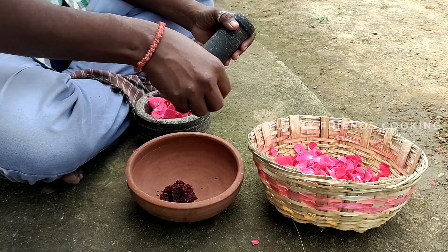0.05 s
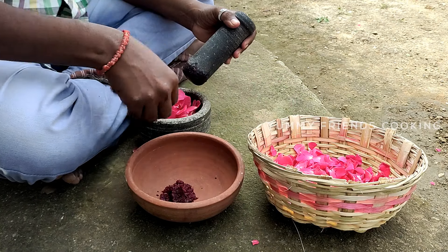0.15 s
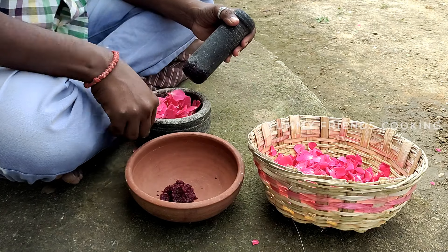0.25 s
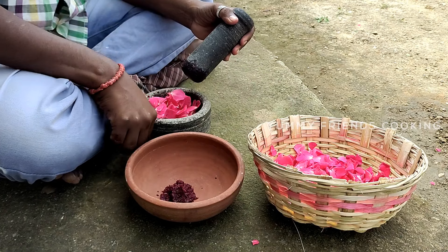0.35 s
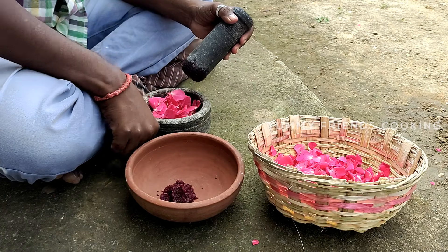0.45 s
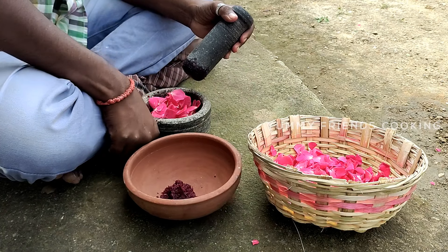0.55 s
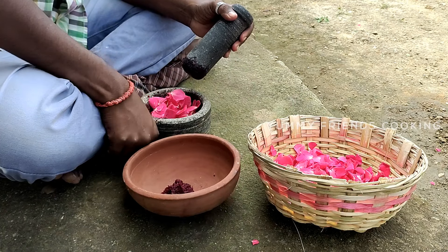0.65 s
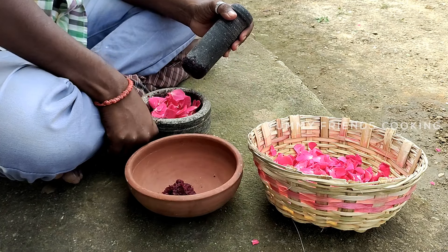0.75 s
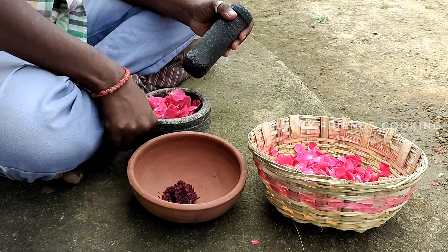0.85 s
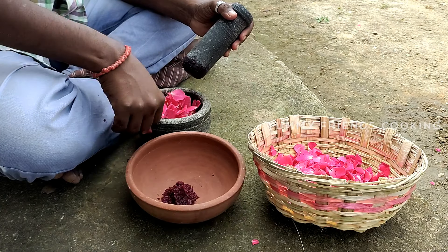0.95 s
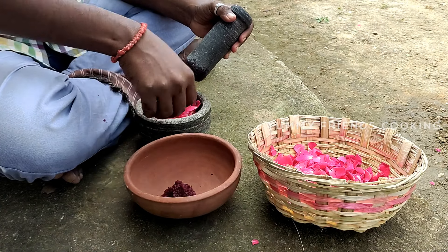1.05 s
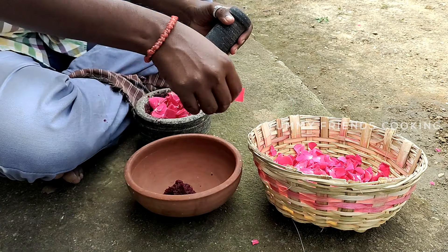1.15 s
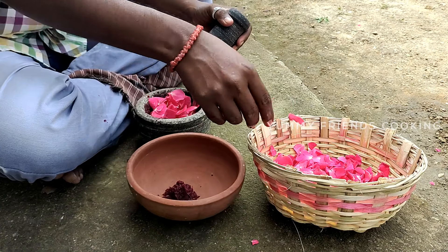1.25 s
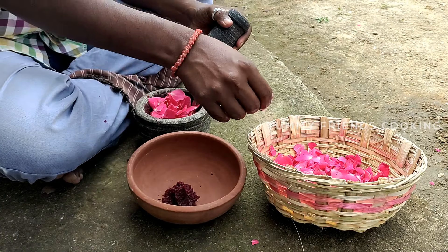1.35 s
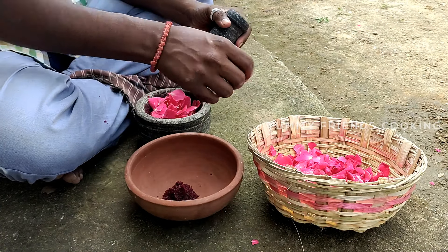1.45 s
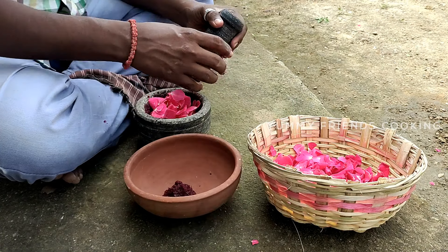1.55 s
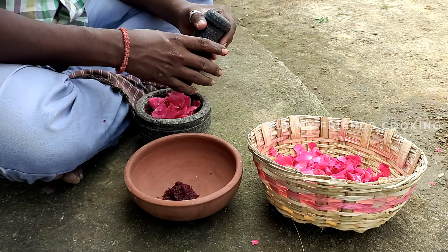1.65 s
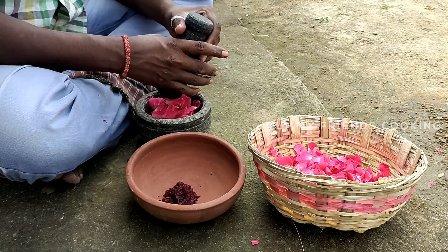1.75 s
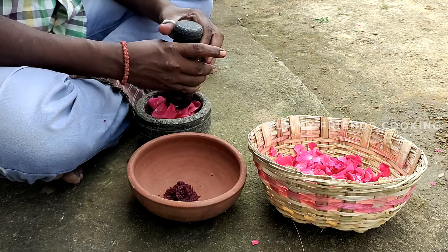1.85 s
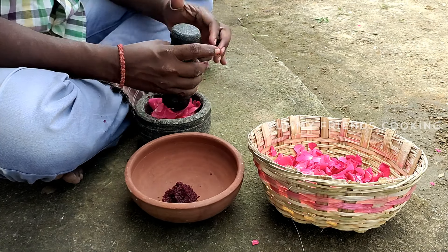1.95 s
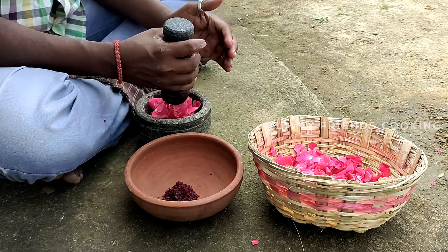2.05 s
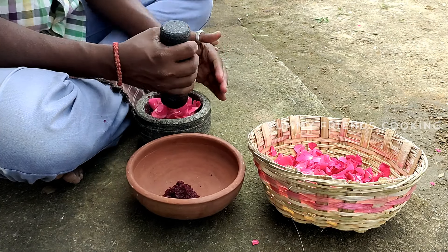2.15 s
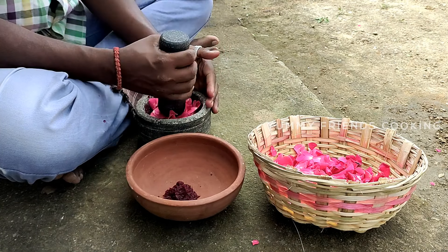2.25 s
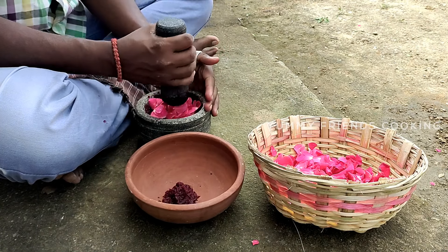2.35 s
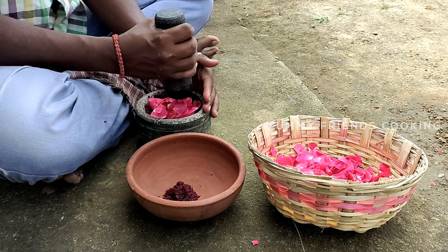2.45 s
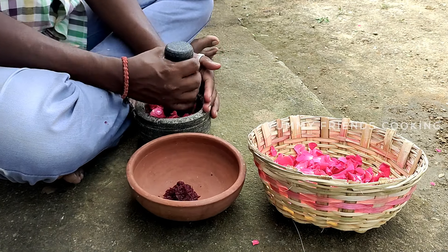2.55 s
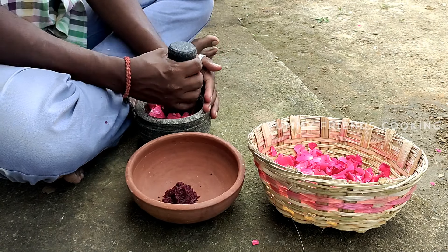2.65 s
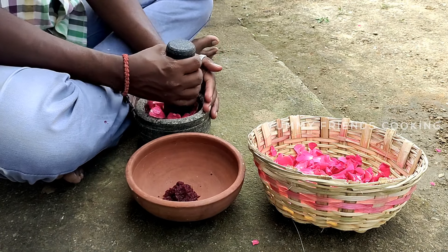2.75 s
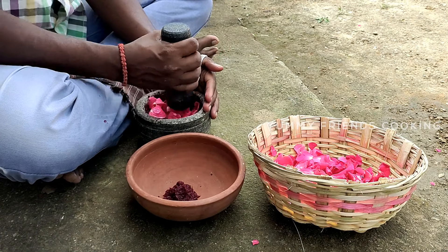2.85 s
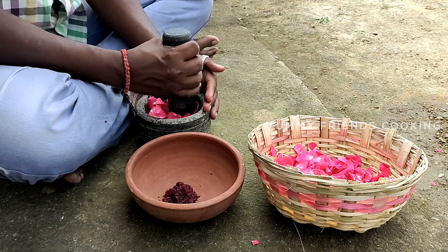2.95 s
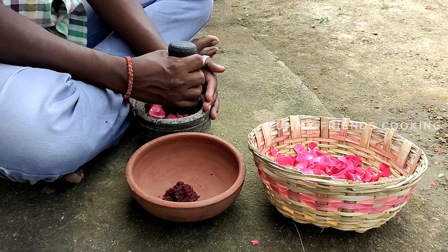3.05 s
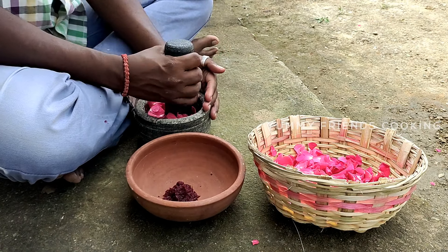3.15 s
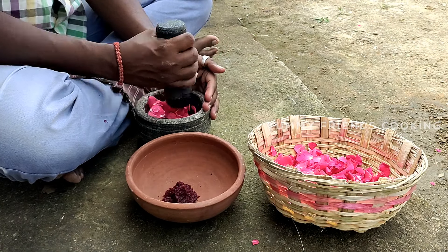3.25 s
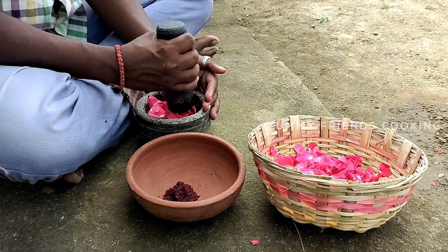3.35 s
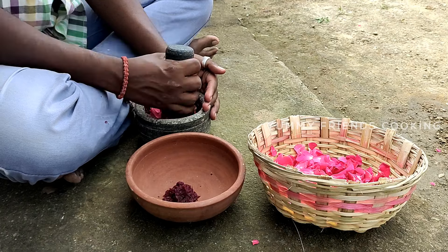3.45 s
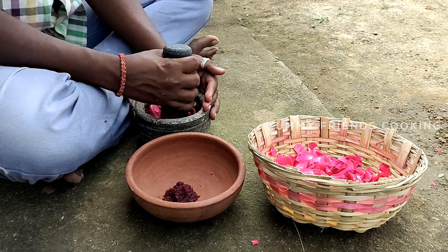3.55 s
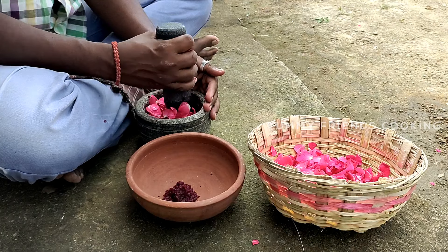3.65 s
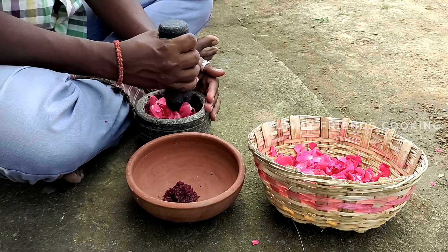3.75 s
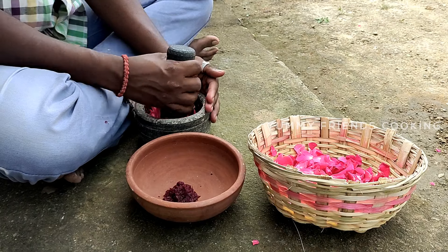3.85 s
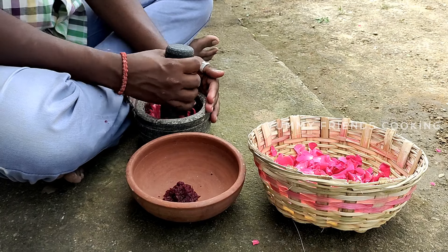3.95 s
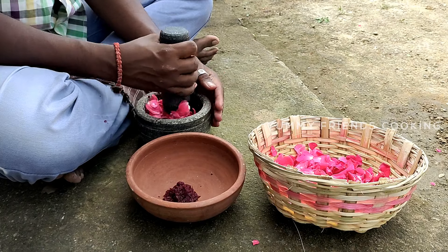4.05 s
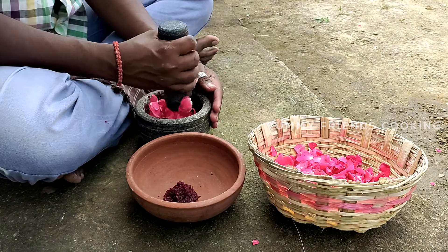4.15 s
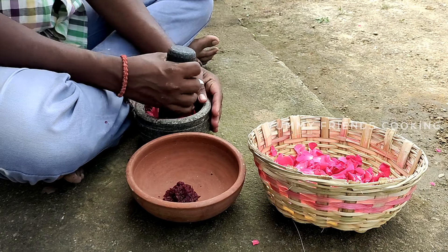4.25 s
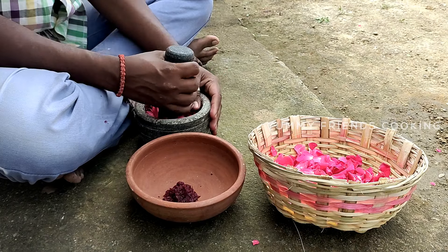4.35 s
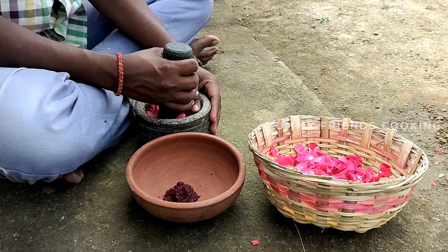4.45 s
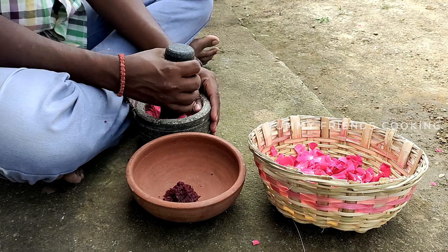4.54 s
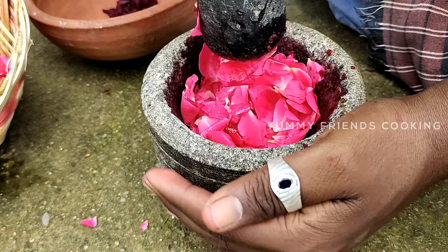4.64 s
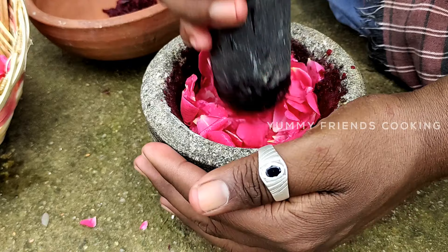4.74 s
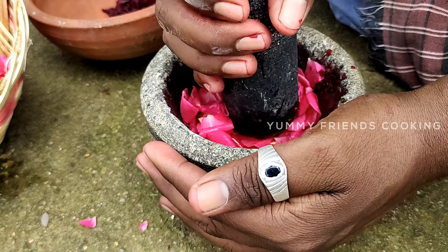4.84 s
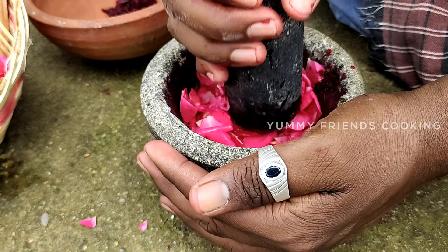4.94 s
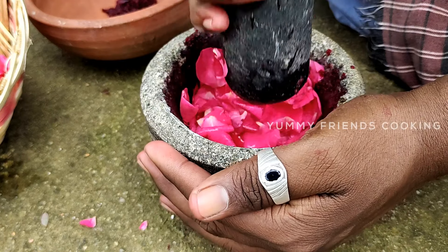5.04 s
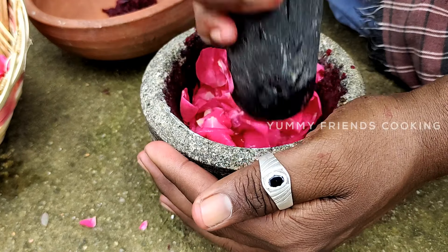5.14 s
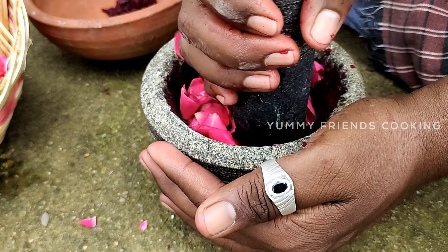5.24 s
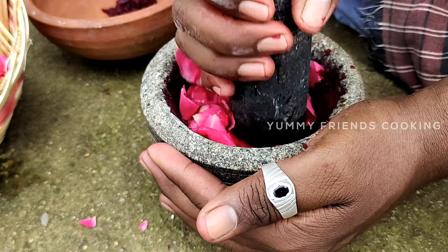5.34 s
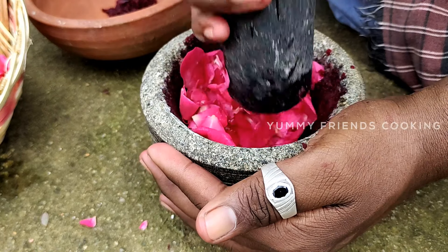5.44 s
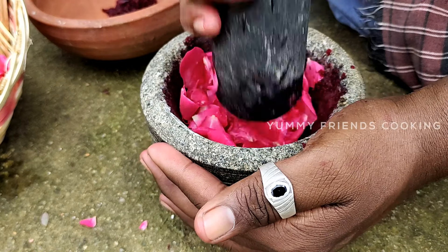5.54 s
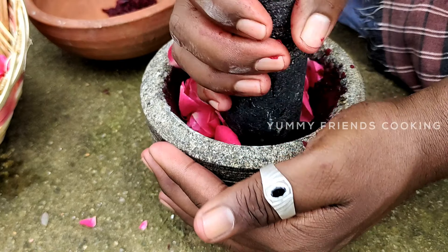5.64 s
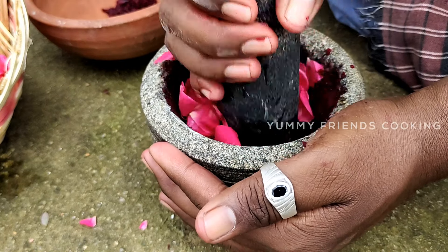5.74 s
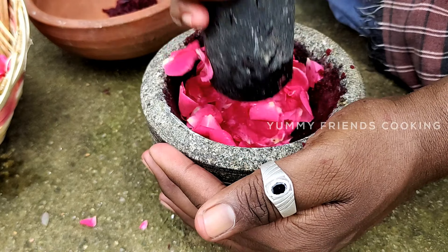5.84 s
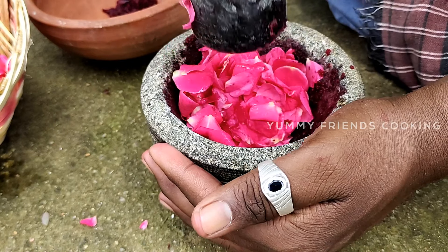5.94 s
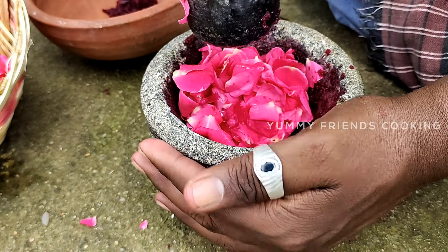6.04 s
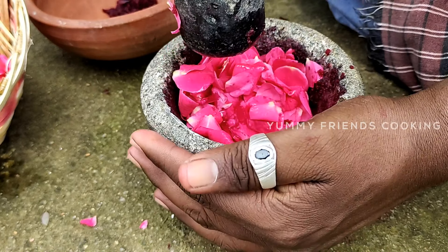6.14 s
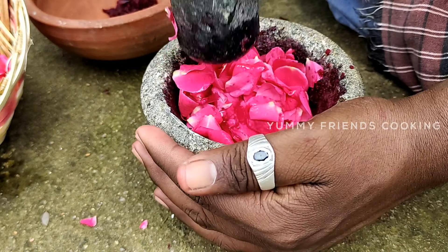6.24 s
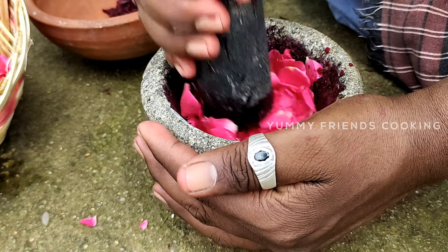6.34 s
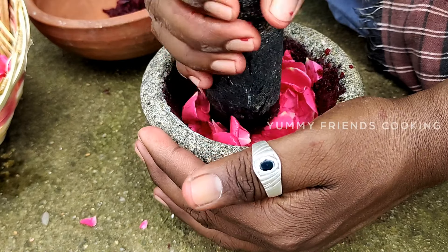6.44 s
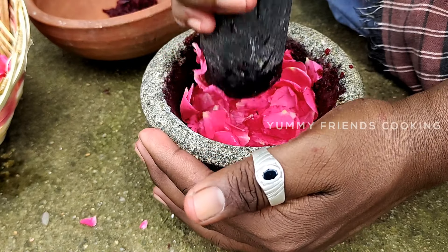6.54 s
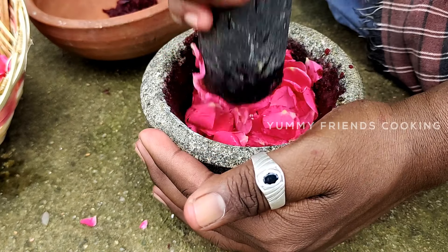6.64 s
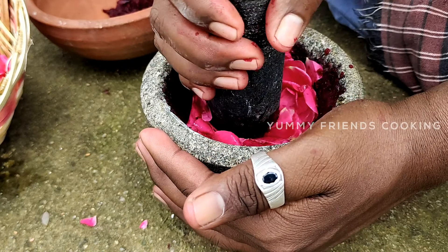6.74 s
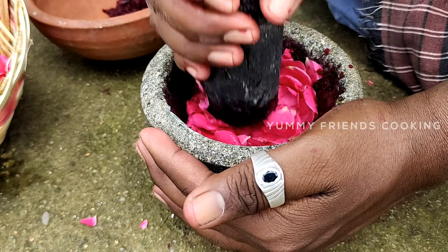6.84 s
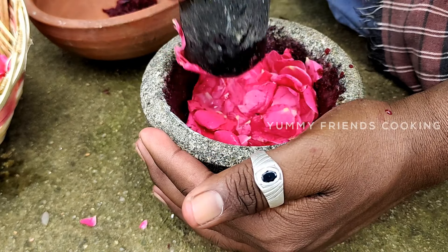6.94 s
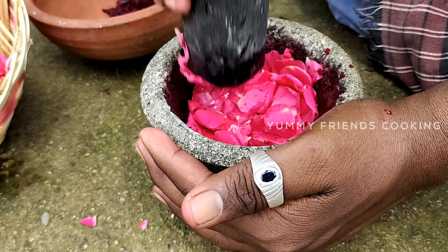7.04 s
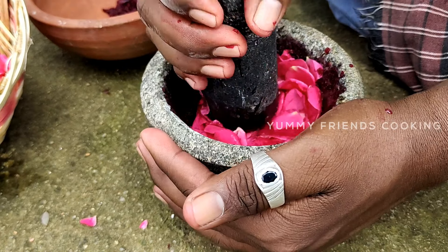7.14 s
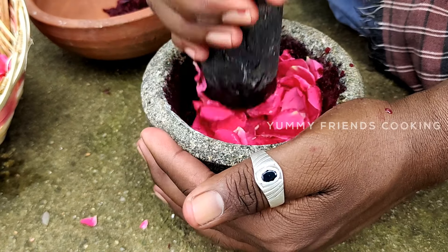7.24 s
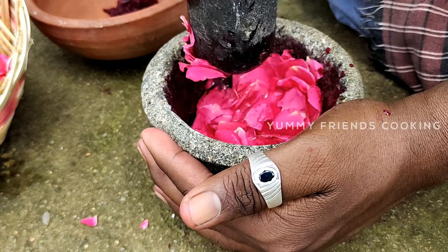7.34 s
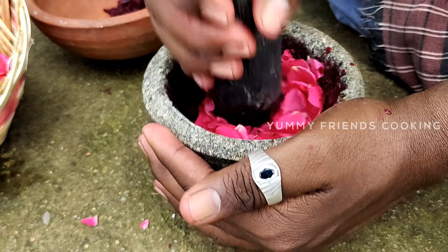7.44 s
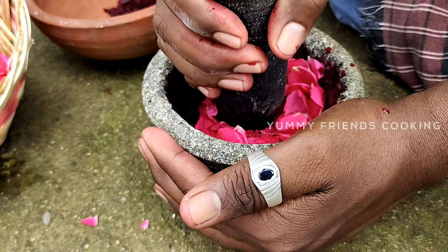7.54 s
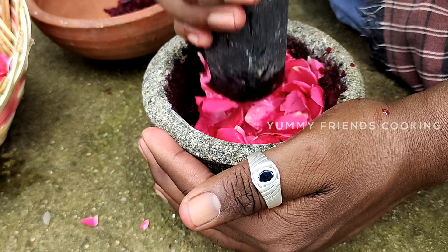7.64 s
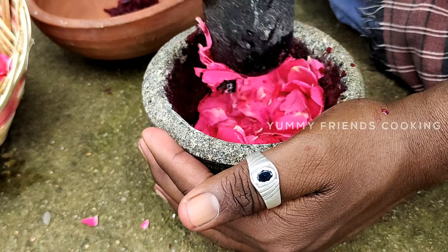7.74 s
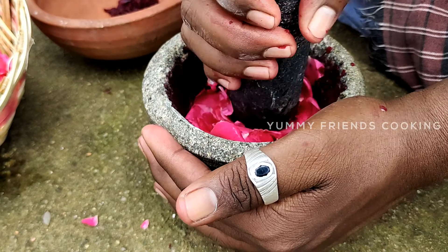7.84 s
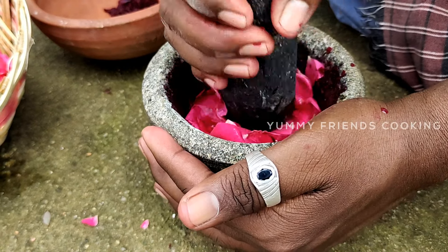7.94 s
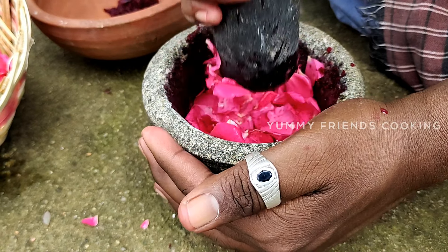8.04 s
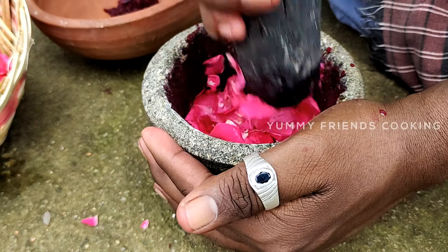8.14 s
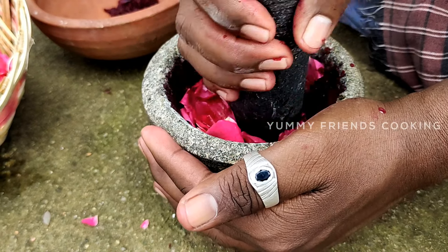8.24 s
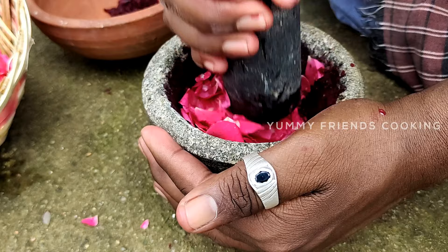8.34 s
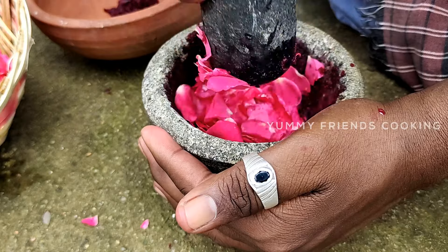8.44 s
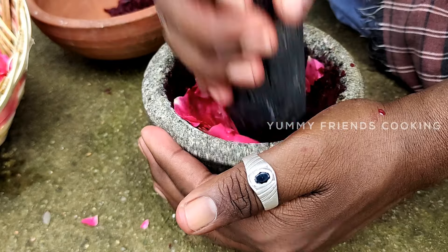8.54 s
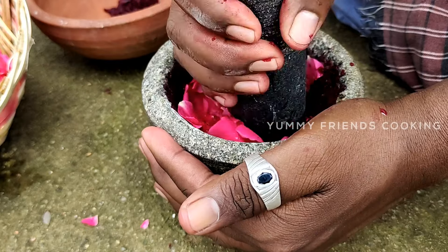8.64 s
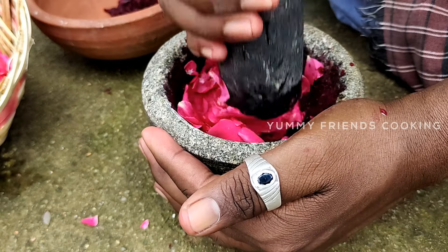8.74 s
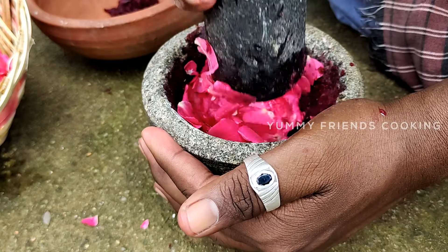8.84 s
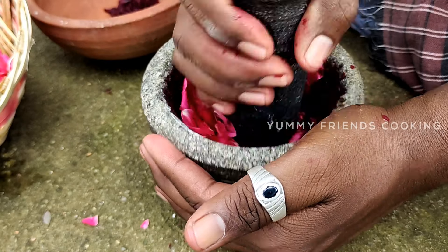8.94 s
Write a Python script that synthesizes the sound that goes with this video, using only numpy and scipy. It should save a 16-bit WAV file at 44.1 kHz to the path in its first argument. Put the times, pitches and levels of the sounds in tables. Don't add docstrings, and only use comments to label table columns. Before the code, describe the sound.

Outdoors, faint insects, far rumble and sparse chirps surround barely audible wet rustles. A stone pestle then begins pounding petals in a small mortar with five dull, earthy thumps and soft squashes. After a very brief silence, the sound turns close and bright: ten quick blows, many of them hard stone clacks with gritty crunches, the loudest slightly distorted, as birds keep calling.

```python
import sys
import numpy as np
from scipy import signal
from scipy.fft import rfft, irfft, next_fast_len
from scipy.io import wavfile
from scipy.ndimage import uniform_filter1d

SR = 44100
rng = np.random.default_rng(int(sys.argv[2]) if len(sys.argv) > 2 else 0)


def to_linear_factor(level_db):
    exponent = np.asarray(level_db, float) / 20
    return 10 ** exponent


def store_wav(level_fs):
    pcm = np.round(np.clip(np.atleast_2d(level_fs), -1, 1) * 32767)
    wavfile.write(sys.argv[1], SR, pcm.T.astype(np.int16))


N = 396459
CHANGE_S = 4.65

# [t/s, peak level/dB, f/Hz, contact length/cycles, rebound level/dB]
THUMPS = [(2.6449, -23, 129, 1.77, -48), (3.0739, -17.5, 141, 1.8, -37.5), (3.493, -16.5, 145, 2.02, -37),
          (3.8991, -13.5, 153.5, 1.9, -27), (4.3109, -16.5, 155, 2.1, -33), (4.89, -18, 162, 1.6, -40),
          (5.3066, -9, 219.6, 2, -47), (5.7099, -17.5, 225, 2.1, -33), (6.4146, -9.5, 205, 1.7, -44),
          (6.809, -10, 160, 1.9, -45), (7.1807, -10.5, 209.7, 1.7, -30), (7.5483, -10.5, 215, 1.5, -42),
          (7.9307, -14.5, 192, 1.5, -29), (8.282, -8, 193.5, 1.3, -26.5), (8.661, -5, 192, 1.39, -23.5)]
# [delay/s, f/Hz, length/cycles]
REBOUND = [
    (0.0116, 136, 2.76),
    (.0106, 250, 3.5),
]
# [t/s, peak level/dB, f/Hz]
LATER_THUMPS = [(2.6784, -37, 174), (2.6917, -44, 170), (3.9315, -38, 183), (4.346, -29, 183), (4.387, -37, 170),
                (4.418, -38, 179), (4.455, -46, 187), (4.9477, -39.5, 198), (5.3226, -16.5, 260),
                (5.338, -36, 200), (5.378, -36, 198), (5.7392, -28.5, 193), (5.7955, -36, 190), (6.4235, -19, 218),
                (6.4675, -30, 208), (6.488, -38.5, 200), (6.8203, -14, 226.5), (6.8302, -30, 172),
                (7.1951, -23, 234), (7.2216, -26, 213), (7.255, -41, 200), (7.5521, -13.5, 190), (7.569, -35, 191),
                (7.583, -27, 224), (7.95, -27.5, 213), (7.9643, -40, 166), (8.3104, -10, 218), (8.335, -32, 196.8),
                (8.699, -50, 200)]
# [t/s, level/dB, bowl level/dB, rim level/dB, pestle level/dB]
CLACKS = [(3.4915, -47.5, -12, 19, 10), (3.898, -49.5, 8.5, 27.5, 11), (4.3098, -46.5, 2, 20.5, 18.5),
          (4.347, -66, 20, -9, 0), (4.883, -23.5, -36, -6, -4), (5.3052, -4, -6.5, -5.5, -8),
          (5.709, -2.5, -10, -4, -14), (6.4142, -3.5, -16.5, -9, -13), (6.8066, -31, -14, 10, 9),
          (6.8086, -31, -15.5, 16, 10.5), (6.8229, -42.5, 21, 11, -6), (7.1802, -5.5, -15.5, -0.5, -16),
          (7.547, -3, -14.5, -0.5, -1), (7.927, -47, 10, -10.5, -8), (8.28, -7, -4, 0.5, -6.5),
          (8.3107, -31, 14.5, -9, -20), (8.659, -27.5, 8.5, -9, 4)]
# [f/Hz, level/dB, t60/s]
BOWL = [(449, 0, 0.016), (568, -14, 0.02), (860, -8.5, 0.0077)]
# [f/Hz, level/dB, t60/s]
BODY = [(1230, 6.5, 0.0061), (1150, -7.5, 0.0036), (1535, 1, 0.0063)]
# [f/Hz, level/dB, t60/s]
RIM = [(2212, 3.5, .01), (1940, -8, 0.011), (2550, -5, 0.0077)]
# [f/Hz, level/dB, t60/s]
RIM_SIDE = [(2147, -1, 0.016), (2753, -5.5, 0.017), (3720, -16, .025), (4410, -5, 0.018),
            (601, -15.5, 0.044)]
# [f/Hz, level/dB, t60/s]
PESTLE = [(4620, -28.5, 0.0043), (5127, -13.5, 0.023), (6170, -21, 0.006), (7060, -17.5, 0.021),
          (7700, -21.5, 0.0037), (9000, -26, .01)]
# [t/s, f/Hz, level/dB, t60/s]
LINGER = [(2.64, 1200, -48, .02), (3.498, 417, -46, 0.05), (4.309, 1000, -34, .02),
          (4.885, 1230, -21, 0.018), (7.928, 1490, -22, 0.011), (5.3053, 1880, -10.5, .01),
          (6.4144, 1540, -10, 0.0092), (7.1802, 1600, -4.5, .008), (6.807, 6550, -16.5, 0.011),
          (3.492, 2143, -35.5, 0.029), (3.492, 3596, -43, .06), (3.898, 2120, -29.5, 0.059),
          (4.309, 2350, -20.5, .025), (4.315, 1950, -42, 0.065), (4.315, 2500, -43, 0.065),
          (5.306, 1200, -21, .06), (5.306, 1906, -29, .069), (5.306, 2466, -30.5, 0.059),
          (5.306, 2659, -49, .2), (5.34, 2020, -43.5, 0.018), (5.71, 1260, -26, 0.1),
          (5.71, 1906, -23.5, .071), (5.716, 436, -22, 0.045), (5.71, 2665, -32.5, .11),
          (5.71, 5168, -35, 0.055), (5.788, 1230, -53.5, 0.22), (6.4154, 4046, -17.5, .008),
          (6.415, 1028, -31.5, 0.073), (6.415, 1776, -35, .049), (6.415, 2396, -32, .045),
          (7.181, 1150, -30.5, .05), (7.181, 2300, -29, .05), (7.548, 2078, -18.5, 0.031),
          (7.548, 2342, -21.5, 0.041), (7.548, 2573, -22.5, 0.061), (7.548, 1200, -35, .09),
          (7.548, 5152, -46, 0.086), (8.281, 1405, -39.5, 0.07), (8.281, 1938, -37, 0.14),
          (8.317, 413.3, -24.5, 0.034), (8.281, 4570, -36, 0.045), (8.658, 1250, -27, .04)]
# [t/s, hiss level/dB, grind level/dB]
SQUASH = [(2.635, -37, -48), (3.066, -33, -42), (3.489, -25, -24), (3.894, -26, -27.5),
          (4.306, -29.5, -32.5), (4.882, -21.5, -21), (5.303, -17.5, -16.5), (5.708, -20, -14.5),
          (6.411, -35.5, -24), (6.804, -11, -11.5), (7.177, -30.5, -19), (7.546, -25.5, -10.5),
          (7.926, -20.5, -21.5), (8.278, -23.5, -22.5), (8.6555, -18, -25.5)]
# [t/s, t60/s, hiss level/dB, grind level/dB]
SLIPS = [(1.219, 0.014, -61, -53), (.742, 0.011, -59, -56.5), (4.113, .008, -48.5, -71),
         (3.245, .012, -54, -64), (4.876, 0.02, -31.5, -45.5), (5.34, .1, -67, -44.5),
         (5.469, 0.017, -57, -72), (5.656, 0.018, -55, -70), (5.718, .05, -70.5, -36),
         (5.803, .012, -53, -72), (6.781, 0.047, -62.5, -58), (6.82, .025, -43.5, -35),
         (7.551, .0072, -24.5, -68), (7.915, 0.046, -52, -50), (8.287, 0.033, -27, -22),
         (8.368, .012, -38.5, -51), (8.409, 0.023, -47.5, -52.5), (8.629, 0.0126, -62, -57),
         (8.695, .015, -55, -63), (8.749, .015, -53, -68), (8.767, 0.079, -52, -62)]
# [t/s, hiss level/dB, grind level/dB]
SKIDS = [
    (6.426, -35.5, -40),
    (6.439, -35.5, -33),
    (6.448, -34.5, -33),
    (7.19, -24.5, -30.5),
]
# [t/s, hiss level/dB, grind level/dB]
PEELS = [(.48, -59, -64), (.58, -60, -69), (.9, -59, -69), (.96, -59.5, -66), (1.018, -54, -63),
         (2.28, -59, -62), (5.005, -60, -62.5), (5.434, -56.5, -63), (5.775, -71.5, -56),
         (5.826, -55.5, -64.5), (6.544, -55.5, -59), (6.905, -52.5, -56), (7.248, -50.5, -59.5),
         (7.658, -52.5, -59), (7.99, -58, -61.5), (8.033, -57.5, -61.5)]
# [f/Hz, level/dB per Hz]
HISS = [(1820, -30), (3100, -7.5), (3890, -4.5), (4340, -5.5), (5220, -6), (6030, -1.5), (7730, -1.5),
        (8280, -10), (8680, -12.5), (10400, -15.5), (12700, -22.5), (14700, -23.5), (16000, -33.5)]
# [f/Hz, level/dB per Hz]
GRIND = [(470, -34.5), (800, -13), (1280, 3.5), (1730, 0), (2230, 0.5), (3100, -14), (4030, -40),
         (6820, -120)]
# [f/Hz, level/dB per Hz]
GRIND_SIDE = [(260, -44), (450, -8), (1010, -2.5), (1490, -5.5), (1620, -6.5), (1930, -1.5), (2190, 2),
              (3100, -11), (4030, -37.5), (6820, -120)]
# [t/s, length/s, start f/Hz, end f/Hz, level/dB]
TICKS = [(0.737, .0093, 905, 520, -53), (.948, .005, 3230, 2880, -59), (1.01, 0.013, 1420, 1430, -61),
         (1.22, .006, 3360, 2600, -54), (4.35, 0.0068, 640, 556, -45), (4.898, 0.0082, 426, 393, -38.5),
         (5.506, .006, 2000, 1900, -56), (5.523, 0.0034, 2860, 1582, -43),
         (6.39, 0.0042, 1250, 1196, -54.5), (6.445, 0.0026, 2212, 2200, -24.5),
         (7.672, .011, 12220, 11730, -66), (8.369, .002, 12500, 10000, -44),
         (8.43, .002, 3400, 1820, -51.5), (8.6555, 0.0035, 3530, 3390, -23)]
# [t/s, start f/Hz, level/dB]
HOOKS = [
    (6.333, 5040, -54),
    (7.416, 4974, -51),
    (8.342, 4705, -54),
    (8.79, 5153, -51.5),
]
# [t/s, start f/Hz, level/dB]
PIPS = [
    (7.603, 4050, -59),
    (7.677, 4030, -56.5),
    (7.774, 4250, -59),
]
# [t/s, start f/Hz, level/dB, overtone level/dB]
WHISTLES = [
    (.108, 4640, -63.5, -28),
    (4.707, 4660, -58, -15),
    (5.126, 4650, -53.5, -7.5),
]
BEND = [2.1, 3]
# [t/s, length/s, start f/Hz, end f/Hz, level/dB]
SLIDES = [(0.05, 0.028, 7140, 7050, -58.5), (.064, 0.02, 7040, 5400, -68), (0.086, 0.04, 5400, 4700, -68),
          (0.166, .05, 4587, 4230, -70), (0.6, .115, 4560, 4230, -70.5), (4.766, 0.037, 4465, 4150, -59),
          (5.272, .025, 2900, 2750, -64.5), (5.185, .025, 4420, 4400, -60.5), (2.188, 0.18, 408, 437, -62),
          (3.432, .03, 2280, 2330, -62.5), (4.702, 0.05, 342, 440, -79), (4.824, 0.019, 3030, 2800, -58),
          (5.232, 0.036, 3346, 3180, -63.5)]
# [t/s, length/s, f/Hz, level/dB]
HELD = [(0.148, .15, 764, -65.5), (.32, .08, 770, -69), (.36, 0.044, 4060, -71), (3.29, 0.093, 6720, -66),
        (3.288, .03, 6350, -66), (0.768, .045, 4290, -72), (.98, .02, 794, -59.5), (1.972, 0.18, 601, -72),
        (3.923, 0.098, 682.6, -62.5), (4.086, .07, 381, -59.5), (4.143, .1, 6690, -67),
        (4.935, .04, 2430, -66), (5.012, 0.033, 2540, -65), (5.085, .04, 2540, -70.5),
        (5.41, .08, 2540, -70), (5.156, .12, 6390, -66.5), (5.21, 0.14, 4620, -65.5),
        (6.186, 0.05, 586, -63.5), (8.481, 0.047, 678, -65)]
# [f/Hz, t60/s]
YARD = [(300, 0.18), (2000, 0.059), (5000, 0.44), (12000, 0.27)]
# [f/Hz, level/dB per Hz]
AIR = [(20, -45.5), (45, -20.5), (100, -4.5), (150, -8), (300, -13), (1200, -22.5), (4600, -28),
       (5900, -28.5), (6700, -21), (7400, -22.5), (8200, -29.5), (11000, -34), (15300, -37), (16200, -58.5)]
AIR_DB = [-58, -58]
# [f/Hz, left minus right level/dB]
PORTS = [(30, -2), (60, 2), (125, 2), (250, 1.5), (500, 0.53), (1500, 0.2), (3000, -0.07), (7000, -1),
         (15000, 0.3)]
# [t/s, length/s]
MUTED = [(3.886, 0.0022), (5.293, .006), (5.692, 0.012), (7.525, 0.015), (8.265, 0.0097), (8.64, 0.0067)]
# [t/s, gain/dB]
JOIN = [(0, 0.5), (4.607, 0), (4.609, -23), (4.622, -56), (4.698, -60), (4.704, -17.5), (4.75, -5.5),
        (4.95, 0.5), (9, 1)]


def unit(x):
    return x / np.sqrt(np.mean(x ** 2) + 1e-20)


def along(points, hz):
    f, v = np.transpose(points)
    return np.interp(np.log(hz + 1), np.log(f + 1), v)


def filtered(x, response):
    m = next_fast_len(N + 8192)
    return irfft(rfft(x, m) * response(np.fft.rfftfreq(m, 1 / SR)), m)[..., :N]


def coloured(x, spectrum):
    return unit(filtered(x, lambda hz: to_linear_factor(along(spectrum, hz))))


def add(out, s, x):
    part = out[round(s * SR):][:len(x)]
    part += x[:len(part)]


def ground(contacts, sign, skew, tail, t60, edge):
    out, t = np.zeros(N), np.arange(SR // 8) / SR
    for s, db, hz, cycles in contacts:
        u = np.clip(t * hz / cycles, 0, 1)
        press = np.sin(np.pi * u ** skew)
        turn = 2 * np.pi * hz * t
        soil = tail * np.minimum(1, 2 * u) * to_linear_factor(-60 * t / t60)
        overtone = edge * press ** 2 * np.cos(2.1 * turn)
        add(out, s, sign * to_linear_factor(db) * ((press + soil) * np.sin(turn) + overtone))
    return filtered(out, lambda f: f ** 4 / (f ** 4 + 75 ** 4))


def rocking():
    rebounds = []
    for s, *_, db in THUMPS:
        delay, hz, cycles = REBOUND[s > CHANGE_S]
        rebounds.append((s + delay, db, hz, cycles))
    rocks = [(s, db, hz, [3.15, 2.2][s > CHANGE_S] - 0.013 * (db + 36.5)) for s, db, hz in LATER_THUMPS]
    return rebounds + rocks


def ring(modes, t, attack):
    out = np.zeros(len(t))
    for hz, db, t60 in modes:
        decay = to_linear_factor(db + rng.normal(0, 1.0) - 60 * t / t60)
        detuned = hz * (1 + .01 * rng.standard_normal())
        out += decay * (1 - np.exp(-t / attack)) ** 2 * np.sin(2 * np.pi * detuned * t)
    return out


def clacks():
    out, t = np.zeros(N), np.arange(SR // 12) / SR
    body_t, bowl_t = np.maximum(t - .00018, 0), np.maximum(t - .0006, 0)
    for s, db, bowl_db, rim_db, pestle_db in CLACKS:
        body = to_linear_factor(11.5) * ring(BODY, body_t, 0.00087)
        bowl = to_linear_factor(bowl_db + 13.0) * ring(BOWL, bowl_t, 0.00055)
        rim = to_linear_factor(rim_db + 5.5) * ring(RIM if s > CHANGE_S else RIM_SIDE, t, 0.0003)
        crack = to_linear_factor(-9.5 - 60 * t / 0.0055) * (1 - np.exp(-t / 0.00054)) * rng.standard_normal(len(t))
        pestle = to_linear_factor(pestle_db + 5.0) * (ring(PESTLE, t, 0.00038) + crack)
        add(out, s, to_linear_factor(db) * (rim + pestle - body - bowl))
    return filtered(out, lambda f: 1 / (1 + 1j * f / 9000))


def lingering():
    out, t = np.zeros(N), np.arange(SR // 6) / SR
    for s, hz, db, t60 in LINGER:
        noise = rng.standard_normal(len(t))
        touch = unit(uniform_filter1d(uniform_filter1d(noise, 100), 100))
        decay = to_linear_factor(db - 60 * t / t60 + 4 * touch) * (1 - np.exp(-t / 0.00071))
        add(out, s, decay * np.sin(2 * np.pi * hz * t + touch))
    return out


def strokes():
    crushes = []
    for (s, hiss_db, grind_db), thump in zip(SQUASH, THUMPS):
        rise = max(0.77 * (thump[0] - s), 1e-3)
        t60 = .027 * to_linear_factor(-0.5 * (hiss_db + 26.5))
        crushes.append((s, rise, t60, hiss_db, grind_db))
    slips = [(s, .002, *rest) for s, *rest in SLIPS]
    skids = [(s, 0.0085, 0.012, *rest) for s, *rest in SKIDS]
    peels = [(s, 0.023, 0.16, *rest) for s, *rest in PEELS]
    return crushes + slips + skids + peels


def crushing():
    hiss, grind, t = np.zeros(N), np.zeros(N), np.arange(SR // 3) / SR
    lead = np.linspace(.2, 1, 500) ** 0.43
    for s, rise, t60, hiss_db, grind_db in strokes():
        fall = 0.62 * to_linear_factor(-60 * (t - rise) / t60) + 0.18 * to_linear_factor(-15 * (t - rise) / t60)
        stroke = np.where(t < rise, (t / rise) ** 1.8, fall)
        add(hiss, s - 500 / SR, to_linear_factor(hiss_db - 27.5) * lead)
        add(grind, s - 500 / SR, to_linear_factor(grind_db - 41.0) * lead)
        add(hiss, s, to_linear_factor(hiss_db) * stroke)
        add(grind, s, to_linear_factor(grind_db) * stroke)
    sizes = unit(uniform_filter1d(rng.standard_normal(N), 30))
    grit = rng.standard_normal(N) * to_linear_factor(3.1 * sizes)
    side = np.arange(N) < CHANGE_S * SR
    return hiss * coloured(grit, HISS) + grind * np.where(side, coloured(grit, GRIND_SIDE), coloured(grit, GRIND))


def ticks():
    out = np.zeros(N)
    for s, length, start_hz, end_hz, db in TICKS:
        u = np.arange(round(length * SR)) / (length * SR)
        turn = 2 * np.pi * np.cumsum(start_hz + (end_hz - start_hz) * u) / SR
        add(out, s, to_linear_factor(db + 4.0) * np.sin(np.pi * u ** 1.7) * np.sin(turn))
    return out


def notes():
    far_over_db = -27
    out = [(s, .041, hz, 4150, db, -8) for s, hz, db in HOOKS]
    out += [(s + 0.018, 0.017, .87 * hz, 4013, db - 6, -3) for s, hz, db in HOOKS]
    out += [(s, 0.036, hz, 0.96 * hz, db, 1.5) for s, hz, db in PIPS]
    out += [(s, 0.092, hz, 0.94 * hz, db, over_db) for s, hz, db, over_db in WHISTLES]
    for calls, trail_db in [(HOOKS, -17), (PIPS, -12)]:
        out += [(s + 0.026, .085, .993 * hz, .993 * hz, db + trail_db, -7) for s, hz, db in calls]
    out += [(*note, far_over_db) for note in SLIDES]
    out += [(s, length, hz, 0.99 * hz, db, far_over_db) for s, length, hz, db in HELD]
    return out


def voice(turn, over_db):
    return np.sin(turn) + to_linear_factor(over_db - 0.5) * np.sin(2 * turn) + to_linear_factor(over_db - 21.0) * np.sin(3 * turn)


def birds():
    out = np.zeros(N)
    husk = to_linear_factor(2.7 * unit(uniform_filter1d(rng.standard_normal(N), 90)))
    for s, length, start_hz, end_hz, db, over_db in notes():
        u = np.arange(round(length * SR)) / (length * SR)
        swell = to_linear_factor(db + 4.0) * np.minimum(1, np.minimum(14 * u, 4 * (1 - u)))
        near = over_db > -23
        hz = start_hz + (end_hz - start_hz) * u ** BEND[int(length > .07)]
        falling = 2 * np.pi * np.cumsum(hz) / SR
        if near and length < .07:
            falling = falling + 8 * (1 - end_hz / start_hz) * np.log(husk[::-1][round(s * SR / 2):][:len(u)])
        held = 2 * np.pi * .992 * start_hz * u * length
        first = to_linear_factor(-3 * u - 3.0) * voice(falling, over_db)
        second = near * to_linear_factor(-9.0) * u ** 0.86 * voice(held, over_db - 1.5)
        add(out, s, swell * (first + second))
    return to_linear_factor(2.0) * husk * out + to_linear_factor(-5) * yard(husk * out)


def yard(x):
    hz, t, z = signal.stft(rng.standard_normal(SR // 2), SR, nperseg=256)
    decay = to_linear_factor(-60 * t / along(YARD, hz)[:, None])
    tail = signal.istft(z * decay, SR, nperseg=256)[1]
    return signal.fftconvolve(np.pad(x, (500, 0)), tail / np.linalg.norm(tail))[:N]


def air():
    z = signal.stft(rng.standard_normal(N), nperseg=512)[2]
    field = uniform_filter1d(uniform_filter1d(rng.standard_normal(z.shape), 8, 0), 12, 1)
    noise = signal.istft(z * to_linear_factor(1.1 * unit(field)), nperseg=512)[1][:N]
    level_db = np.where(np.arange(N) < CHANGE_S * SR, *AIR_DB)
    return to_linear_factor(level_db) * coloured(noise, AIR)


def scene():
    pushes = [row[:-1] for row in THUMPS]
    thumps = ground(pushes, 0.87, skew=0.61, tail=0.19, t60=0.045, edge=0.0097)
    thumps = thumps + ground(rocking(), -1, skew=0.77, tail=0.16, t60=0.052, edge=0.25)
    stone = clacks() + crushing() + lingering()
    echoes = to_linear_factor(-30.0) * yard(stone + to_linear_factor(12.5) * thumps)
    mix = thumps + stone + echoes + birds() + ticks() + air()
    diffuse = yard(stone) * to_linear_factor(-17.5) + air()
    apart = to_linear_factor(-38.0) * filtered(diffuse, lambda f: (f > 2500) + (f < 500))
    return np.array([mix + apart, mix - apart])


def treble_muted(x):
    t = np.arange(N) / SR
    gate = sum((t > s) & (t < s + length) for s, length in MUTED) * 1.
    treble = filtered(x, lambda hz: hz ** 4 / (hz ** 4 + 800 ** 4))
    return x - (1 - to_linear_factor(-20)) * uniform_filter1d(gate, 90) * treble


def band_limit(x):
    return signal.sosfilt(signal.butter(12, 16430, fs=SR, output="sos"), x)


def record(dry):
    def port_response(hz):
        phase = np.outer([1, -1], .075 * hz / 8000)
        return to_linear_factor(np.outer([.5, -.5], along(PORTS, hz))) * np.exp(1j * phase)

    ports = filtered(dry, port_response)
    clipped = ports / (1 + np.abs(ports) ** 8) ** (1 / 8)
    coupled = np.clip(filtered(clipped, lambda hz: hz ** 2 / (hz ** 2 + 28 ** 2)), -1, 1)
    limited = filtered(coupled, lambda hz: hz < 16600)
    gain_db = np.interp(np.arange(N) / SR, *np.transpose(JOIN))
    return band_limit(treble_muted(limited) * to_linear_factor(gain_db))


dry = scene()
out = record(dry)
store_wav(out)
```